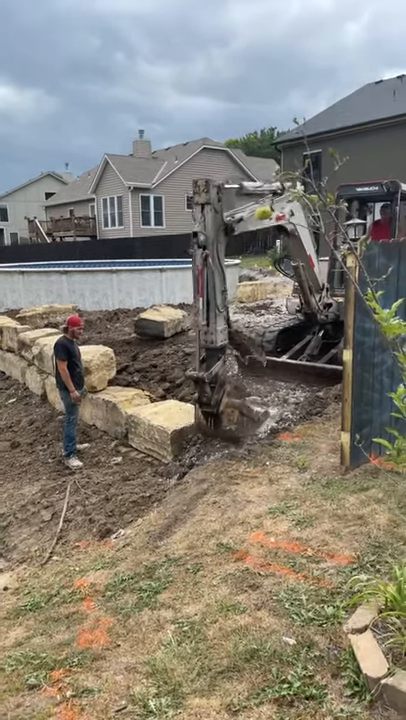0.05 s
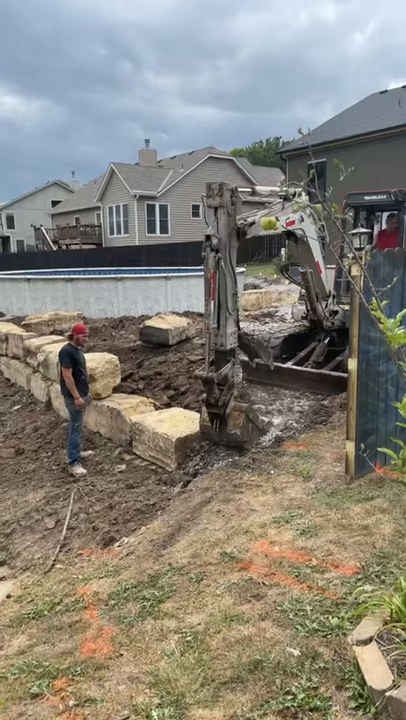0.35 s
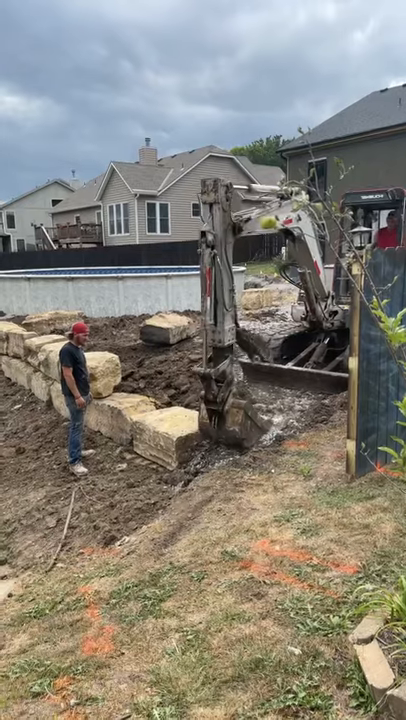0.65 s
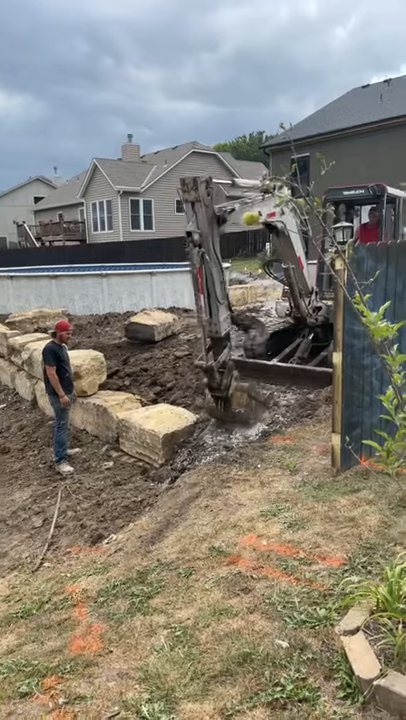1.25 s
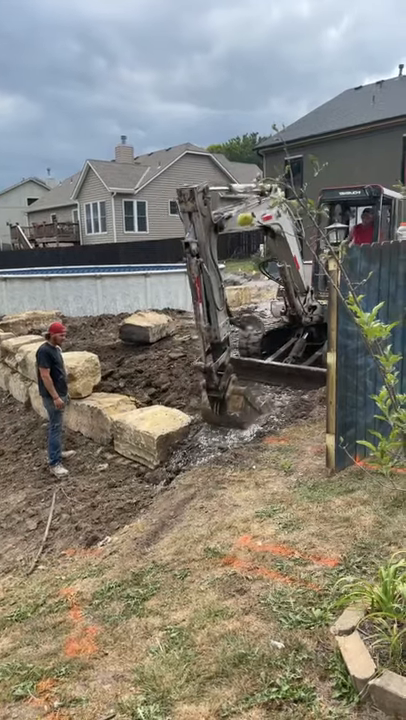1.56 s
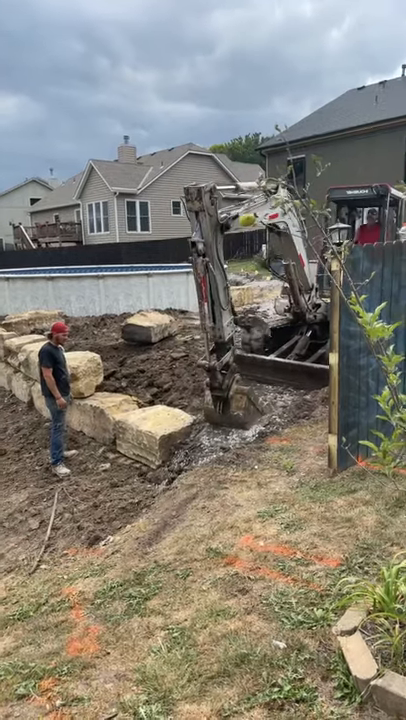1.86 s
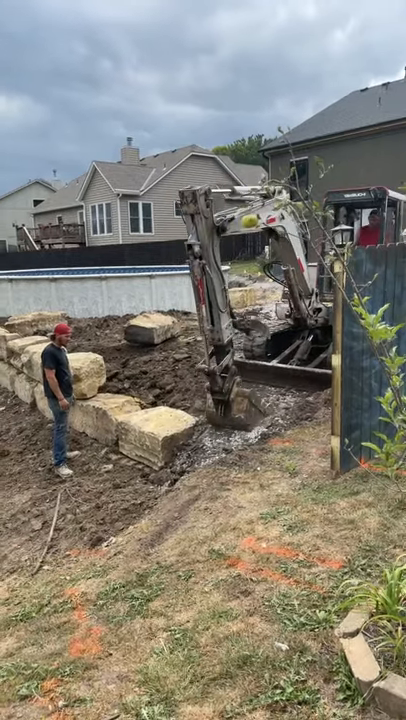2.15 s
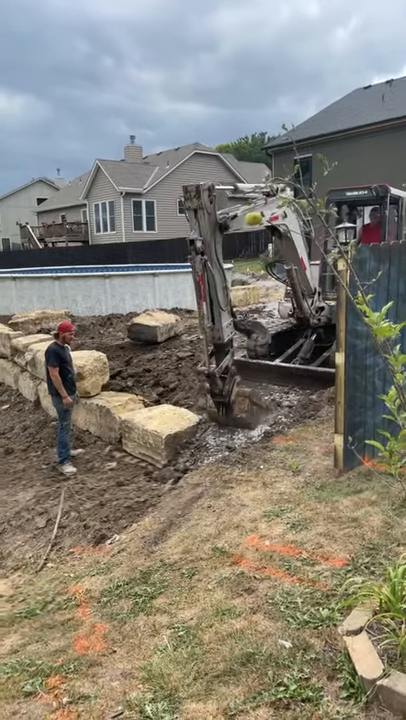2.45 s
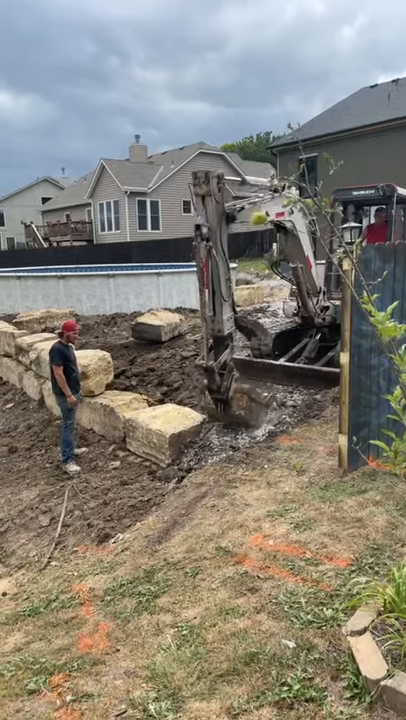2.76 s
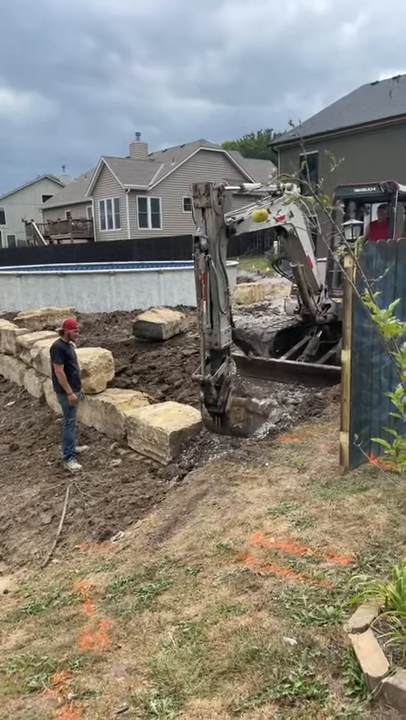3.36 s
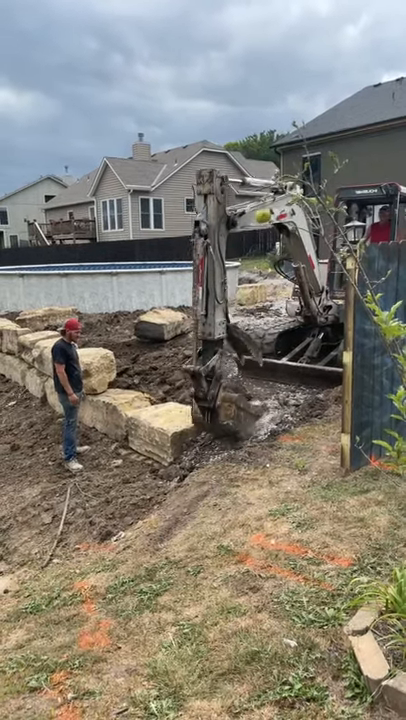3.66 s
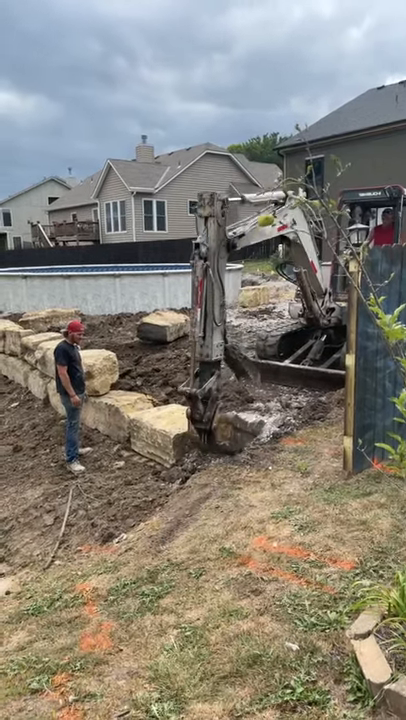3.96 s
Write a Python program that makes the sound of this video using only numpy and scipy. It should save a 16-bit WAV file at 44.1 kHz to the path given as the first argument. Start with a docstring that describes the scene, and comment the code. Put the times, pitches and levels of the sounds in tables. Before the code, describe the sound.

Steel digger bucket booming and clanging on rock, scraping gravel, with a diesel engine droning behind.

```python
"""The steel bucket of a small excavator digs stony ground in a back yard, close to a single microphone.
It knocks on rock, booming and clanging, and grinds through gravel between the blows. Loose stones clack,
chips snap, the teeth squeak briefly and earth tumbles off. Behind it the diesel engine drones and sags
under load, and the house walls answer faintly."""
import sys
import numpy as np
from scipy import signal
from scipy.fft import rfft, irfft
from scipy.io import wavfile

SR = 44100
rng = np.random.default_rng(int(sys.argv[2]) if len(sys.argv) > 2 else 0)


def put_to_file(sound):
    """Save the sound as 16-bit audio at rate SR, in the file named by the first command-line argument."""
    columns = np.atleast_2d(sound).T  # one column per channel
    safe = np.clip(columns, -1, 1)
    whole_steps = np.round(safe * 32767)
    wavfile.write(sys.argv[1], SR, whole_steps.astype(np.int16))


N = 176400
T = np.arange(N) / SR
CONTACT_S, CRACK_RISE_S = 0.0015, 0.00072


def from_db(db):
    """Decibels to gain."""
    return 10 ** (np.asarray(db) / 20)


def rms_one(x):
    """Scale to rms 1."""
    return x / np.sqrt(np.mean(x ** 2) + 1e-20)


def unit_energy(response):
    """Scale a response so that white noise keeps its level."""
    return response / np.sqrt(np.sum(response ** 2))


def through(x, response):
    """Play a sound through an impulse response."""
    return signal.fftconvolve(x, response)[:N]


def filtered(x, order, hz, kind="low"):
    """Butterworth filter."""
    return signal.sosfilt(signal.butter(order, hz, kind, fs=SR, output="sos"), x)


def colour(x, spectrum):
    """Shape a steady sound by (freq_hz, level_db) points; rms 1."""
    hz, db = np.transpose(spectrum)
    bins_hz = np.maximum(np.fft.rfftfreq(N, 1 / SR), 1)
    gain = from_db(np.interp(np.log(bins_hz), np.log(hz), db))
    return rms_one(irfft(rfft(x) * gain, N))


def drift(rate_hz):
    """A smooth random wander with spread 1."""
    step, settle = 40, 2000
    pole = np.exp(-2 * np.pi * rate_hz * step / SR)
    noise = rng.standard_normal(N // step + settle + 2)
    slow = signal.lfilter([1], [1, -2 * pole, pole * pole], noise)[settle:]
    return np.interp(np.arange(N) / step, np.arange(len(slow)), rms_one(slow))


def decay(t, t60):
    """Exponential fall of 60 dB in t60 seconds."""
    return np.exp(-np.log(1000) * t / t60)


def envelope(start, rise, hold, t60):
    """Linear attack, then exponential release from hold seconds after the start."""
    age = T - start
    return np.clip(age / rise, 0, 1) * decay(np.clip(age - hold, 0, 2 * t60), t60)


def sine(hz, start):
    """A tone that rises through zero at the start time."""
    return np.sin(2 * np.pi * hz * (T - start))


# Tones of the diesel, behind the bucket: firing_multiple, level_db
ENGINE_ORDERS = [(1, -32), (1.5, -39.5), (2, -25.5), (2.5, -44.5), (3, -33.5), (4, -46.5)]
# Spectrum of its exhaust and fan: freq_hz, relative_db
EXHAUST_SPECTRUM = [(30, -33), (85, 5.5), (130, -5), (240, 2), (330, -2.5), (480, -14), (720, -13.5),
                    (3000, -29), (7500, -43.5), (9300, -41.5), (15000, -54.5)]
# The engine labours as the bucket bites: centre_s, firing_drop_hz
ENGINE_SAGS = [(0.25, 2.16), (0.88, 2.02), (1.78, 4.16), (2.97, 1.57), (3.76, 2)]

def engine(unloaded_hz=51.2, sag_s=0.15, throb_depth=0.24, noise_db=-32.5):
    """Firing tones that sag briefly under load, with noise that throbs at each firing."""
    firing_hz = unloaded_hz - sum(drop * np.exp(-((T - s) / sag_s) ** 2) for s, drop in ENGINE_SAGS)
    phase = 2 * np.pi * np.cumsum(firing_hz) / SR
    loudest_db = max(db for _, db in ENGINE_ORDERS)
    tones = np.zeros(N)
    for multiple, db in ENGINE_ORDERS:
        waver_db = 2 * (0.0855 * (loudest_db - db)) ** 2 * drift(9.1)  # weaker tones waver more
        tones += np.sqrt(2) * from_db(db + waver_db) * np.cos(multiple * phase + rng.uniform(0, 2 * np.pi))
    exhaust = rng.standard_normal(N) * (1 + throb_depth * np.cos(phase))
    return tones + from_db(noise_db) * colour(exhaust, EXHAUST_SPECTRUM)


# Echo off a house wall a few metres away: delay_s, level_db
WALL_ECHOES = [(.024, -16)]

def yard(x, build_s=0.12, t60_s=0.24, tail_db=-14):
    """The walls return a dull echo and a faint scattered tail."""
    t = T[:SR]
    tail = rng.standard_normal(SR) * np.minimum(t / build_s, 1) * decay(t, t60_s)
    response = from_db(tail_db) * unit_energy(tail)
    for delay, db in WALL_ECHOES:
        response[int(delay * SR)] += from_db(db)
    return filtered(through(x, response), 1, hz=6000)


def grains(per_s=5000, spread_db=2):
    """A dense stream of tiny fractures of uneven size; rms 1."""
    sizes = from_db(spread_db * np.minimum(rng.exponential(1, N), 5))
    signs = rng.choice([-1, 1], N)
    return rms_one(sizes * signs * (rng.random(N) < per_s / SR))


def pebbles(per_s=1100, t60_s=0.093, ping_db=-3, low_hz=1580, high_hz=15800):
    """Fractures mixed with the short pings of pebbles, each at a pitch of its own; rms 1."""
    pings, t = np.zeros(N + SR), T[:int(t60_s * SR)]
    for when, pitch, size in rng.random((int(per_s * N / SR), 3)):
        onset = int(when * N)
        hz = low_hz + (high_hz - low_hz) * pitch
        pings[onset:onset + len(t)] += size ** 2 * decay(t, t60_s) * np.sin(2 * np.pi * hz * t)
    return rms_one(grains() + from_db(ping_db) * rms_one(pings[:N]))


# Spectrum of coarse grit in the trench: freq_hz, relative_db
GRIT_SPECTRUM = [(150, 10), (480, 7.5), (1200, -1), (2000, 1), (2750, 0), (4100, -7), (4800, -13),
                 (6200, -15), (8000, -27), (15000, -79)]

def grit(fractures):
    """Coarse stone breaks with a low crunch; rms 1."""
    return colour(fractures, GRIT_SPECTRUM)


# Spectrum of the finest fragments, at close range: freq_hz, relative_db
FINES_SPECTRUM = [(1500, -26), (4000, 5), (6000, 3.5), (7300, -3), (8400, 0.5), (9800, 1), (11000, -6.5),
                  (13000, -6.5), (15500, -14)]

def fines(fractures):
    """Fine fragments make a bright hiss; rms 1."""
    return colour(fractures, FINES_SPECTRUM)


# Squeaks at the bucket's teeth: start_s, pitch_hz, level_db
TOOTH_SQUEAKS = [(0.193, 3440, -30), (1.401, 4080, -37), (1.522, 9750, -35), (1.718, 10800, -45),
                 (2.499, 6370, -45), (2.517, 5560, -43), (3.126, 9750, -47), (3.518, 2570, -38),
                 (3.855, 10800, -50.5)]

def squeaks(rise_s=0.0099, pitch_waver=0.0088):
    """Steel rubs on stone in brief wavering tones that swell and die."""
    out = np.zeros(N)
    for start, hz, db in TOOTH_SQUEAKS:
        age = np.clip((T - start) / rise_s, 0, 20)
        phase = 2 * np.pi * hz * np.cumsum(1 + pitch_waver * drift(110)) / SR
        out += from_db(db) * age * np.exp(1 - age) * np.sin(phase)
    return out


# Chips snapping in front of the microphone: start_s, level_db
STONE_CHIPS = [(0.754, -39.5), (1.880, -53), (1.972, -45), (1.999, -49), (2.023, -50), (2.967, -30),
               (3.074, -44.5), (3.217, -34), (3.446, -41.5)]

def chips(t60_s=0.04, band_hz=(5900, 12798)):
    """Stone snaps in short bright sprays of splinters."""
    bursts = sum(from_db(db) * envelope(s, CRACK_RISE_S, CONTACT_S, t60_s) for s, db in STONE_CHIPS)
    return bursts * rms_one(filtered(grains(), 2, band_hz, "band"))


# Loose stones knocking together around the bucket: start_s, pitch_hz, relative_db
STONE_CLACKS = [(0.324, 1794, -26.5), (0.663, 693, -30.5), (1.219, 1050, -34.5), (1.265, 1203, -23),
                (1.500, 890, -26), (2.272, 805, -27), (2.648, 1100, -30.5), (3.326, 710, -25),
                (3.415, 843, -21.5), (3.573, 1450, -27.5)]

def clacks(ring_db=-3.5, body_db=-4, grit_db=-17, top_hz=4380):
    """Each stone rings briefly and hollowly, then chatters around its own pitch."""
    out = np.zeros(N)
    crunch = from_db(grit_db) * grit(pebbles())
    for start, hz, db in STONE_CLACKS:
        body = from_db(body_db) * rms_one(signal.lfilter(*signal.iirpeak(hz, Q=2.5, fs=SR), grains()))
        ring = from_db(ring_db) * envelope(start, CRACK_RISE_S, CONTACT_S, t60=0.065) * sine(hz, start)
        chatter = envelope(start, CRACK_RISE_S, CONTACT_S, t60=0.19) * (body + crunch)
        out += from_db(db) * (ring + chatter)
    return filtered(out, 4, top_hz)


def tumbling_earth(start_s=1.62, length_s=0.41, level_db=-31, band_hz=(105, 170)):
    """Loose earth rumbles down off the bucket."""
    rumble = rms_one(filtered(grains(), 2, band_hz, "band"))
    return from_db(level_db) * envelope(start_s, rise=0.022, hold=length_s, t60=length_s) * rumble


# Low modes of bucket and arm: pitch_hz, relative_db, t60_s
BUCKET_MODES = [(161.7, -13.5, 0.088), (232.5, -2.5, 0.3), (322, -2.5, 0.06), (370, -6.5, 0.049)]

def boom_response():
    """The low modes, alternating in sign, so that the boom swells over a cycle or two; peak 1."""
    t = T[:SR // 2]
    ring = sum((-1) ** k * from_db(db) * decay(t, t60) * np.cos(2 * np.pi * hz * t)
               for k, (hz, db, t60) in enumerate(BUCKET_MODES))
    return ring / np.abs(ring).max()


# Modes of the bucket's plates, main plate first: pitch_hz, width_hz, relative_db
STEEL_MODES = [(672.2, 54, 3), (802, 52, 0), (907, 68, -1), (1023, 70, -7), (1173, 102, -5),
               (1508, 76, -10.5), (1677, 79, -10.5), (1881, 90, -11.5)]

def plate_response(band_hz=(400, 2800)):
    """The damped ring of the steel plates, dulled by mud."""
    t = T[:SR // 4]
    ring = sum((-1) ** k * from_db(db) * width * np.exp(-np.pi * width * t) * np.cos(2 * np.pi * hz * t)
               for k, (hz, width, db) in enumerate(STEEL_MODES))
    return unit_energy(filtered(ring, 2, band_hz, "band"))


# The bucket drags through gravel close by, levels relative:
# start_s, length_s, t60_s, boom_db, clang_db, grit_db, fines_db
GRAVEL_DRAGS = [(-0.02, 0.047, 0.3, -20, -30, -29.5, -38.5), (0.074, 0.091, 0.34, -29.5, -29, -28, -43.5),
                (0.216, 0.1, 1, -30, -46, -40, -57), (0.735, 0.018, 0.3, -26, -29, -34, -64),
                (1.473, 0.048, 0.21, -20, -44, -26.5, -35), (1.544, 0.066, 0.45, -20, -28, -28, -42),
                (1.704, 0.08, 0.11, -22, -33, -35, -52.5), (1.792, 0.046, 0.6, -33.5, -41, -31, -44.5),
                (1.887, 0.11, 0.85, -35.5, -44, -44, -53.5), (2.233, 0.057, 0.46, -24, -37, -36, -58),
                (2.501, 0.025, .4, -24, -33, -38.5, -65), (2.93, 0.021, 0.23, -49, -49, -37, -38),
                (2.954, 0.03, 0.32, -17, -22.5, -19, -47), (3.064, 0.11, 0.26, -22, -30.5, -33.5, -54),
                (3.203, 0.038, 0.17, -16.5, -30.5, -24.5, -39), (3.327, 0.12, 1, -29, -45.5, -42.5, -56),
                (3.563, 0.089, 0.26, -30, -32.5, -38.5, -74),
                (3.912, 0.068, 0.32, -24.5, -37.5, -30.5, -40.5)]

def drags(rise_s=0.022, slip_hz=61, slip_db=1.5, gain_db=2.44):
    """Gravel sticks and slips under the bucket, shaking its modes; grit cracks and fines hiss."""
    power = sum(np.outer(from_db(levels_db), envelope(start, rise_s, length, t60)) ** 2
                for start, length, t60, *levels_db in GRAVEL_DRAGS)
    stick_slip = from_db(gain_db + slip_db * drift(slip_hz))
    boom_level, clang_level, grit_level, fines_level = np.sqrt(power) * stick_slip
    boom = through(boom_level * grains(), unit_energy(boom_response()))
    clang = through(clang_level * grains(), plate_response())
    return boom + clang + grit_level * grit(grains()) + fines_level * fines(pebbles())


# The bucket strikes rock close to the microphone, levels relative:
# start_s, thud_pitch_hz, boom_db, clang_db, crunch_db
ROCK_KNOCKS = [(0.02, 286, -3, -5, -14.5), (0.082, 295, -39, -11, -29), (0.089, 270, -3, -36, -20.5),
               (0.134, 246, -13.5, -22.5, -23), (0.776, 278, -5.5, -12, -20.5),
               (0.853, 300, -22.5, -39, -43), (0.921, 220, -21, -47, -52), (1.370, 301.6, -2.5, -13.5, -16),
               (1.511, 336, -20.5, -19.5, -18.5), (1.536, 375, -28, -14, -26), (1.549, 286, -8, -23, -36),
               (1.692, 238, -17.5, -57, -53), (2.266, 245.5, -14.5, -23, -35),
               (2.491, 298, -14, -19.5, -24), (2.754, 252, -18, -30, -39), (2.962, 202, -14.5, -16.5, -30),
               (2.994, 305, -5, -13.5, -20), (3.12, 276.6, -16, -23.5, -41),
               (3.182, 290, -14.5, -21, -22.5), (3.242, 300, -23.5, -24, -21),
               (3.615, 275, -9, -15.5, -23.5)]

def knocks(thud_db=3.5, push_db=-1, toll_db=-1, strike_db=19, chatter_db=-0.5, crumble_db=-3):
    """Each blow thuds and rings the bucket, while the rock crumbles and chatters against the plates."""
    thud, toll, push, strike, chatter, crumble = np.zeros((6, N))
    main_plate_hz = STEEL_MODES[0][0]
    for start, hz, boom_db, clang_db, crunch_db in ROCK_KNOCKS:
        thud_shape = envelope(start, rise=0.003, hold=0.003, t60=0.066)
        clang_shape = envelope(start, CONTACT_S, CONTACT_S, t60=0.13)
        crunch_shape = envelope(start - CRACK_RISE_S, CRACK_RISE_S, CRACK_RISE_S, t60=0.25)
        thud += from_db(boom_db + thud_db) * thud_shape * np.sqrt(2) * sine(hz, start)
        toll += from_db(clang_db + toll_db) * clang_shape * sine(main_plate_hz, start)
        push[int(start * SR)] += from_db(boom_db + push_db)
        strike[int(start * SR)] += from_db(clang_db + strike_db)
        chatter += from_db(clang_db + chatter_db) * clang_shape
        crumble += from_db(crunch_db + crumble_db) * crunch_shape
    boom = through(push, boom_response())
    clang = through(strike + chatter * grains(), plate_response())
    crunch = crumble * grit(pebbles())
    # hard blows throw off far more fine splinters than soft ones
    splinters = from_db(-1.5) * crumble ** 1.57 * fines(grains())
    return thud + toll + boom + clang + crunch + splinters


def scene():
    """The digging and its echo in the yard, over the engine, in mono."""
    digging = knocks() + clacks() + drags() + tumbling_earth() + chips() + squeaks()
    return (engine() + digging + yard(digging))[None]


def record(dry):
    """At the microphone the loudest peaks are rounded and the top is cut."""
    ceiling, cutoff_hz = 0.75, 15800
    rounded = ceiling * np.tanh(dry / ceiling)
    return signal.sosfilt(signal.ellip(10, .1, 80, cutoff_hz, fs=SR, output="sos"), rounded)


dry = scene()
out = record(dry)
put_to_file(out)
```